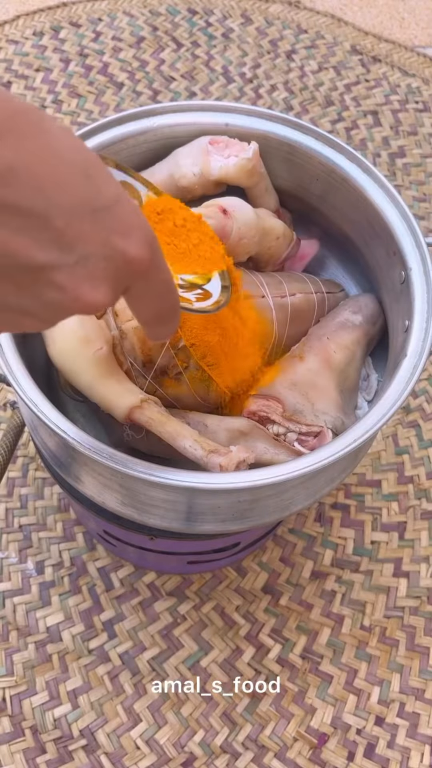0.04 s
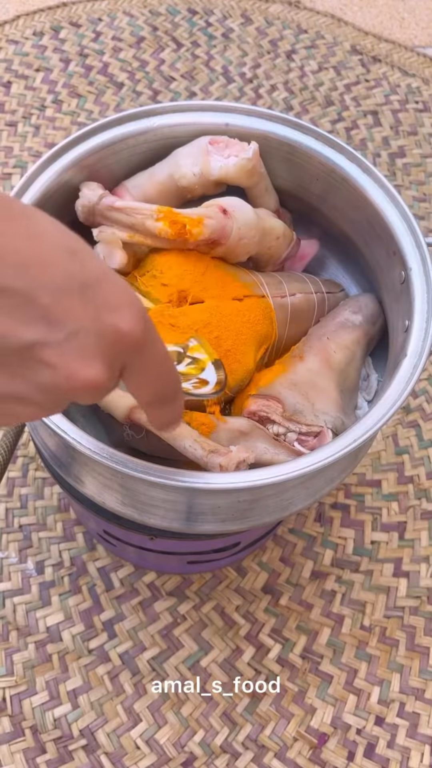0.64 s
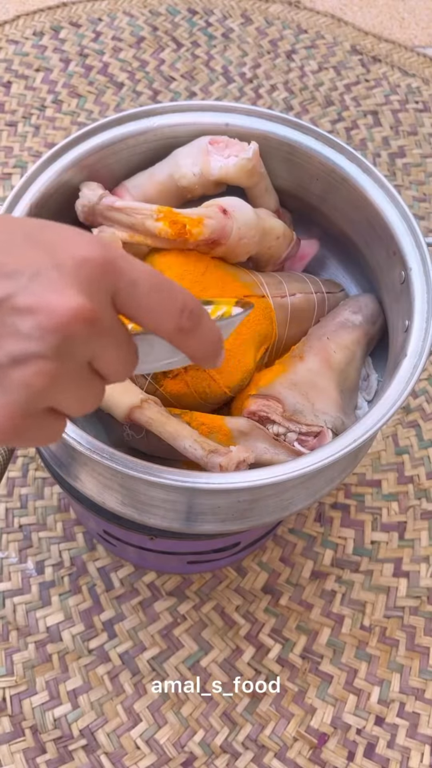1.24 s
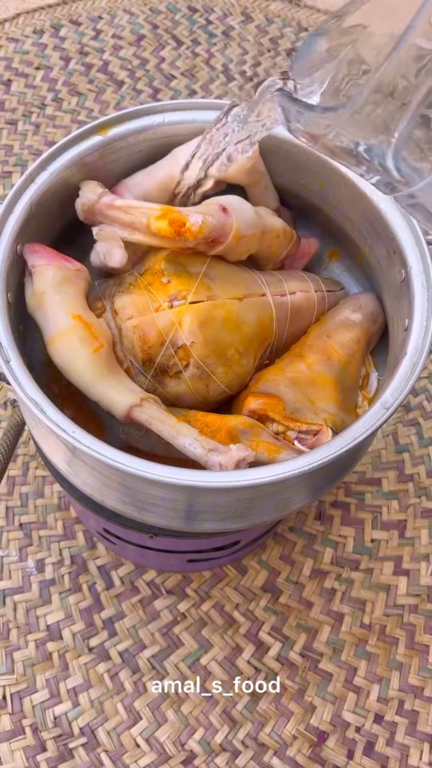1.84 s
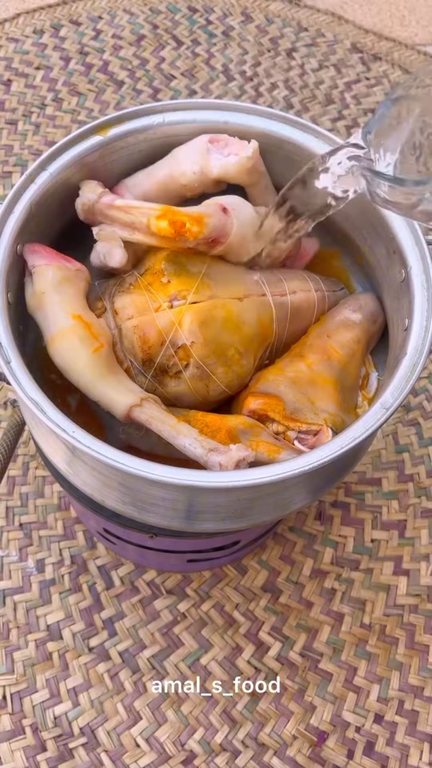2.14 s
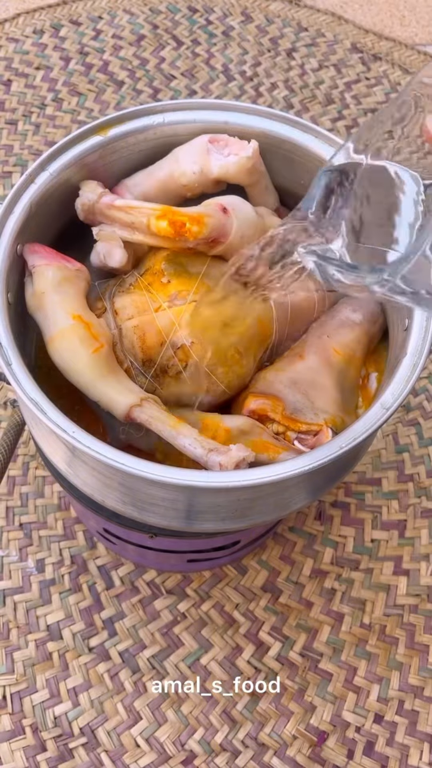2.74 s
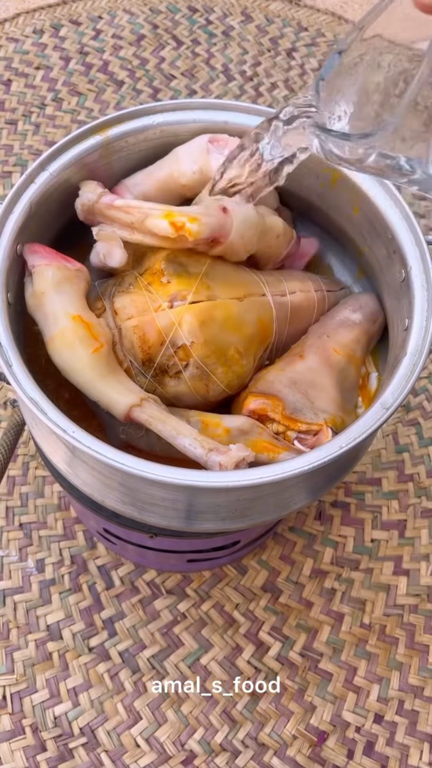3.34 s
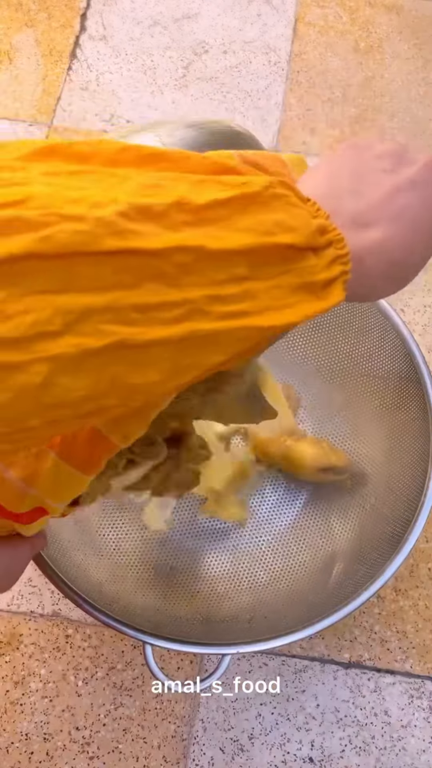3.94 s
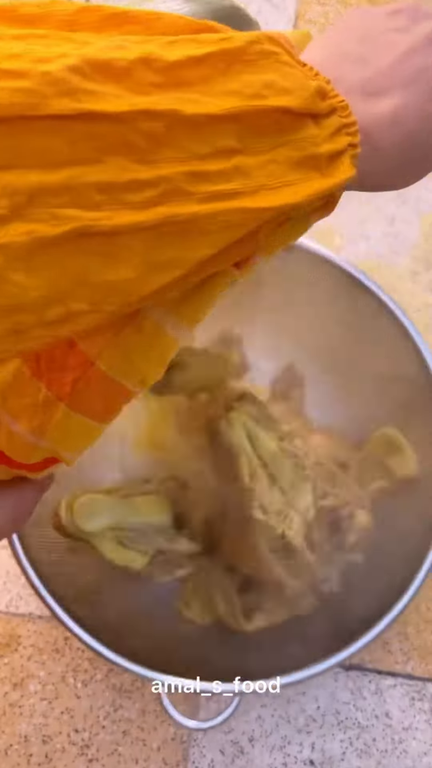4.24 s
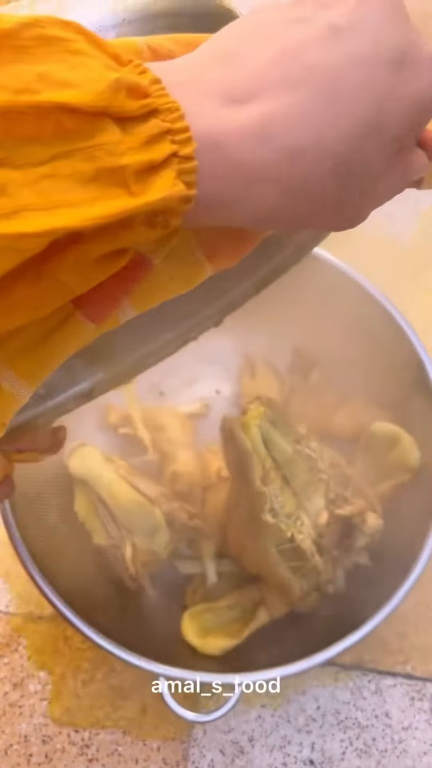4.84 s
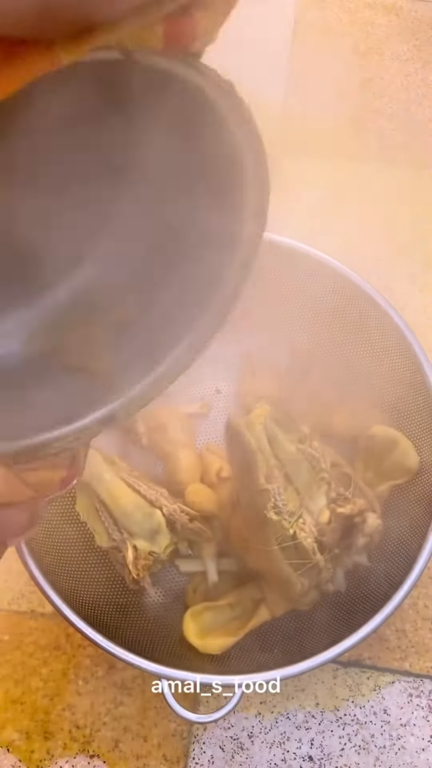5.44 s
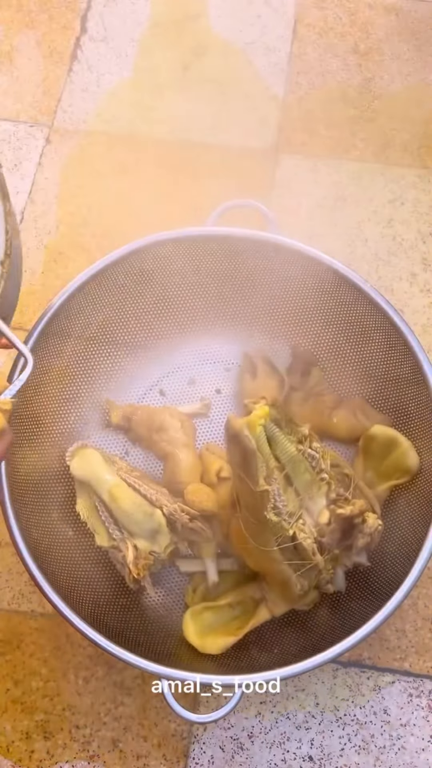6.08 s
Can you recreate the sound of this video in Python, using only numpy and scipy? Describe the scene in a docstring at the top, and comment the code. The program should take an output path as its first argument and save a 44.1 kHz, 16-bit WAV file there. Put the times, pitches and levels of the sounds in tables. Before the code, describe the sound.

A splashing pour into a metal pot, then wet thuds in a steel colander and trickling broth, over a faint low hum.

```python
"""A low rumble and a wandering hum open the scene and stay under it; spice swishes off a spoon.
A jug pours water over meat in a steel pot: trapped air gurgles and pings, drops splash and tick.
Cooked meat and broth are tipped into a steel colander: wet slaps that keep the bowl ringing faintly,
popping air pockets, a falling slurp, dull thuds and bone knocks, then the hiss of draining broth.
All of it plays close to a small two-port microphone."""
import sys
import numpy as np
from scipy import signal
from scipy.fft import rfft, irfft, next_fast_len
from scipy.io import wavfile
from scipy.ndimage import uniform_filter1d, map_coordinates

SR = 44100
rng = np.random.default_rng(int(sys.argv[2]) if len(sys.argv) > 2 else 0)


def store_pcm(level_fs):
    """Save levels as 16-bit WAV."""
    pcm = np.round(np.clip(level_fs, -1, 1) * 32767).astype(np.int16)
    wavfile.write(sys.argv[1], SR, np.atleast_2d(pcm).T)


N = 273905

# hum tones: t/s, length/s, f/Hz, sink/(Hz/s), level/dB
HUM_TONES = [(-.03, 0.21, 119, 19, -39), (0.304, 0.2, 111.1, 17, -43.5), (0.548, 0.53, 132.4, 22, -44),
             (1.706, 2.82, 102.7, 1.566, -45), (5.184, 0.81, 194.2, 0.4, -54)]
# swishes of powder: peak t/s, level/dB, swell/s
SWISHES = [(0.624, -52.5, 0.011), (.799, -73, 0.011), (0.966, -65, 0.012)]
# the stream swings off the meat into the pool: t/s, length/s, gurgle/dB, bubbling/dB, spatter/dB
PLUNGES = [(1.529, 0.097, -64, -43.5, -39), (1.805, 0.13, -52, -40, -40), (1.885, 0.072, -44.5, -37, -43),
           (2.11, 0.073, -46, -42, -65), (2.188, 0.047, -54, -37.5, -61), (2.329, 0.13, -57, -42.5, -41),
           (2.546, 0.079, -59, -58, -41), (2.612, 0.058, -51, -38.5, -37.5), (2.73, 0.033, -42, -42, -42.5),
           (3.042, 0.066, -53.5, -47.5, -41), (3.2, 0.16, -41.5, -41, -46),
           (3.383, 0.35, -46, -44.5, -61.5)]
# the stream pounds the bottom of the pot: t/s, length/s, level/dB
POUNDING = [(3.2, 0.89, -37.5)]
# the stream thins for a moment: t/s, half length/s, dip/dB
THINNINGS = [(1.404, 0.057, -6), (2.109, .022, -7.5), (2.826, 0.0046, -6.5), (2.917, 0.016, -3)]
# lumps of water hit steel and skin: t/s, snap/dB, plop/dB, snap length/s
SPLASHES = [(1.386, -33, -65, 0.0025), (1.481, -32.5, -44.5, 0.0027), (1.533, -29, -45, 0.0032),
            (1.598, -39.5, -38, 0.0018), (1.628, -28, -56, 0.0027), (1.765, -33, -39.5, 0.0017),
            (1.776, -33, -40, 0.00084), (2.019, -28.5, -39, 0.0022), (2.139, -31, -62, 0.0019),
            (2.152, -45, -55, .0025), (2.239, -37.5, -44, 0.0058), (2.284, -28, -52, .0015),
            (2.356, -21.5, -43, 0.00052), (2.415, -33, -42, 0.0031), (2.511, -26, -60, 0.00068),
            (2.54, -30, -65, 0.0015), (2.609, -35, -47, 0.0055), (2.755, -32, -35.5, 0.0013),
            (2.846, -37, -42, 0.0037), (3.014, -37, -44, 0.0016), (3.036, -27, -58, .001),
            (3.058, -23.5, -38.5, 0.0029), (3.185, -28.5, -50, .0014), (3.272, -29, -58, 0.0043),
            (3.391, -50, -37.5, 0.0015), (3.463, -30.5, -43, 0.0016), (3.501, -32, -41, 0.0023),
            (3.567, -36.5, -62, .0059), (3.71, -20, -39, 0.0026)]
# solo bubbles, drips and popping air pockets: t/s, level/dB, f/Hz, t60/s
BUBBLES = [(1.533, -22, 4430, 0.017), (1.542, -30.5, 1410, 0.031), (1.765, -31, 1140, 0.023),
           (1.815, -30, 1305, 0.047), (1.844, -19, 1970, .016), (2.208, -24.5, 1940, 0.02),
           (2.291, -31, 1820, .015), (2.359, -15.5, 5400, 0.006), (2.477, -34, 1240, 0.066),
           (2.62, -17, 2820, 0.022), (2.754, -23.5, 1090, 0.018), (2.778, -31.5, 1210, 0.031),
           (2.848, -30.5, 1800, 0.02), (3.257, -28, 558, 0.089), (3.28, -33, 705, 0.04),
           (3.305, -26.5, 597, .07), (3.33, -27.5, 843, 0.055), (3.313, -30.5, 1940, 0.04),
           (3.388, -24, 580, 0.037), (3.4655, -7.5, 8000, 0.001), (3.59, -25.5, 600, .03),
           (3.691, -21.5, 1980, 0.012), (3.73, -32, 3600, 0.0072), (3.858, -18, 1174, 0.03),
           (3.884, -28, 3370, 0.0094), (4.003, -6, 1040, 0.015), (4.008, -8, 1810, 0.016),
           (4.017, -6, 1146, 0.022), (4.02, -10.5, 1950, 0.019), (4.071, -18, 2140, 0.019),
           (4.072, -20, 7400, .012), (4.176, -13, 915, 0.05), (4.176, -15, 1850, 0.018),
           (4.199, -10, 2190, 0.025), (4.2, -12, 858, .03), (4.2, -8.5, 2690, .012),
           (4.378, -12, 1320, 0.014), (4.378, -5.5, 808, 0.022), (4.767, -22, 2090, 0.0094),
           (4.779, -22, 1900, 0.0046), (4.779, -10.5, 3900, 0.0045)]
# broth gushes out with the meat: t/s, length/s, level/dB
GUSHES = [(3.745, 0.39, -45), (4.005, 0.075, -31.5), (4.09, 0.17, -32), (4.2, 0.1, -26.5),
          (4.37, 0.035, -31), (4.43, 0.023, -32), (4.655, 0.014, -42), (4.76, 0.011, -43)]
# soft low swells as the emptied pot is moved away: t/s, length/s, level/dB
SWELLS = [(4.84, 0.044, -37.5), (5.23, 0.09, -40.5), (5.75, 0.029, -44.5), (6.11, 0.018, -49)]
# wet pieces land: t/s, level/dB, spray offset/dB, length/s, tone/ratio to SLAP_EQ
SLAPS = [(3.736, -43, -9, 0.073, 1.33), (3.865, -29, -20, 0.0037, 1.06), (3.899, -48, 6, 0.0091, 1.3),
         (4.002, -18.5, -21, 0.0034, 1.08), (4.01, -18.5, -16, .004, 1.11), (4.016, -21, -29, 0.021, 1.09),
         (4.0684, -28.5, 2, 0.012, 0.93), (4.177, -22.5, -16, 0.0046, 1.03), (4.193, -32, -2, .003, 0.79),
         (4.199, -19, -11, 0.0043, 0.92), (4.217, -38, -18, 0.0042, .9), (4.247, -21, -4, 0.0072, 1.2),
         (4.279, -21.5, 0.5, 0.0052, 1.9), (4.311, -27, -18, 0.0043, 1.4), (4.377, -20, -15, 0.0067, 1.1),
         (4.444, -19.5, -23, 0.0031, 0.82), (4.454, -25, -2, 0.0043, 1.04), (4.643, -53.5, 11, 0.017, 1),
         (4.67, -45, -19, .003, .85), (4.674, -30.5, -13, 0.0047, 0.97), (4.766, -32.5, -7, 0.0036, 0.77),
         (4.781, -46, 3, 0.0014, 1.2)]
# the meat's weight on colander and pot: t/s, level/dB, f/Hz, t60/s
THUDS = [(3.755, -20, 153, 0.14), (3.796, -23, 152, 0.18), (3.871, -25, 141, 0.066), (4.08, -17, 121, 0.11),
         (4.104, -15.5, 138, 0.14), (4.214, -13.5, 131, 0.066), (4.253, -12, 101.7, 0.12),
         (4.272, -10.5, 122, 0.043), (4.288, -7.5, 418.5, 0.076), (4.306, -19.5, 115, 0.073),
         (4.393, -18, 86, 0.09), (4.444, -20, 244, 0.095), (4.476, -10, 110, 0.03),
         (4.673, -16.5, 420, 0.026), (4.771, -21, 143, 0.036), (5.765, -41.5, 431, 0.16)]
# bones knock the colander: t/s, level/dB
KNOCKS = [(4.012, -25), (4.288, -14), (4.38, -28)]
# ringing modes of the colander: f/Hz, level/dB, t60/s
BOWL_MODES = [(395, -4, .09), (458, -2.5, .36), (522, -26, .45), (792, -25, .55), (997, -21, .5),
              (1228, -22, .5), (1394, -27, .5), (1600, -27, .5), (1805, -22, .45), (1986, -27, .4),
              (2154, -25, .45), (2366, -29, .35), (2623, -32, .3), (3055, -29, .25)]

# EQ curves that colour each layer: f/Hz, level/dB
RUMBLE_EQ = [(22, -37), (31, -14), (42, -9.5), (75, 3), (130, -3.5), (220, -11.5), (450, -17.5), (800, -28),
             (1500, -32), (2200, -36.5), (3200, -49), (5000, -51), (7000, -59.5), (15000, -73)]
GURGLE_EQ = [(150, -29), (300, 6), (450, 4.5), (600, 5.5), (800, 1), (1200, 6), (2500, -15)]
BUBBLING_EQ = [(500, -1), (900, -3), (1300, -1.5), (1900, 6.5), (2400, 6), (2900, 0), (3600, 13.5),
               (6000, -50)]
SPATTER_EQ = [(1500, -53), (2900, 3.5), (3700, -6), (5000, 4.5), (6500, -1.5), (8500, -2.5), (11000, -8.5),
              (12300, -15), (15000, -24.5)]
DRAIN_EQ = [(1200, -26), (2000, -5), (2700, -8), (3500, 1), (4900, 3), (6500, -3.5), (8500, -7),
            (11000, -16), (15000, -31.5)]
BOWL_DRUM_EQ = [(50, -17), (100, 8.5), (160, 3.5), (240, -1.5), (400, -5.5), (550, -11.5), (1000, -35)]
SPRAY_EQ = [(1200, -21), (2500, 7), (3700, -2), (5000, 3), (7800, -0.5), (10000, -10.5), (12000, -14),
            (15000, -27)]
SLAP_EQ = [(150, -24), (400, -12), (620, -9), (950, 1), (1250, -1), (1500, -7), (1900, 0), (2400, -7),
           (3200, -15), (5000, -25), (12000, -55)]
POWDER_EQ = [(3000, -5), (4500, -12), (5800, -1), (7000, -5), (8500, -2.5), (10000, -7), (11000, -2),
             (15000, -24)]
POT_DRUM_EQ = [(90, -20), (120, 12.5), (150, 2.5), (210, -12), (300, -4), (450, -52), (800, -39)]
SNAP_EQ = [(1200, -36), (3000, 20.5), (5000, 21), (8500, 12), (11000, 5.5), (15000, -14)]
PLOP_EQ = [(200, 1), (550, 16), (1200, 5), (2000, 21.5), (3000, 12.5), (6000, -2), (12000, -52)]
TRICKLE_EQ = [(400, -5), (800, 3), (1400, 0), (2100, 3), (2800, -21)]
SLOSH_EQ = [(400, 8.5), (600, -5.5), (1000, -1), (1400, -6.5), (2000, 0.5), (2800, 0), (5000, -4)]

# paths to the two ports: f/Hz, left lead/rad, left over right/dB, scattered share/0-1
POT_PATH = [(100, -.05, 0, 0), (300, -.7, -1, .08), (600, -1.7, -3.5, .05), (950, -2.9, -5, .55),
            (1300, -6, -4, .3), (1750, -5.9, -3, .07), (2200, -4.4, -3, .33), (2900, -3.4, -2, .12),
            (4600, -4.7, 0, .35), (6000, -3.1, 0, .03), (7700, 0, 0, .15), (10000, 2, 0, .5),
            (14000, 6.3, 0, .1)]
BOWL_PATH = [(100, -.17, -.3, 0), (200, -.33, -.4, .01), (400, -.95, -1, .03), (700, -2, -5, .25),
             (1050, -3, -6.5, .5), (1750, 0, -4.5, .17), (2250, 1.6, -4, .45), (2750, 3.1, -3, .06),
             (4600, .6, -1, .45), (6100, 3.1, 0, .12), (7700, 6.3, 0, .15), (11000, 7, 0, .45),
             (15000, 12.5, 0, .2)]

POUR_START_S, TIP_START_S, DRAIN_END_S = 1.376, 3.73, 6.195  # the pour stops as the tipping starts
TIME = np.arange(N) / SR


def amp(db):
    """Decibels to gain."""
    return 10 ** (np.asarray(db) / 20)


def unit(x):
    """Scale to rms 1."""
    return x / np.sqrt(np.mean(x ** 2) + 1e-20)


def along(points, hz):
    """Read a curve of (f/Hz, value) points on a log frequency axis."""
    f, values = np.transpose(points)
    return np.interp(np.log(hz + 1), np.log(f), values)


def wobble(rate):
    """A smooth random modulator, rate knots a second."""
    return map_coordinates(rng.standard_normal(4096), [TIME * rate], mode="wrap")


def filtered(x, response):
    """Filter x by a complex response of frequency."""
    size = next_fast_len(N + 8192)
    return irfft(rfft(x, size) * response(np.fft.rfftfreq(size, 1 / SR)), size)[..., :N]


def coloured(x, eq):
    """x through an EQ curve that rolls off beyond both ends, at rms 1."""
    (low_hz, low_db), (high_hz, high_db) = eq[0], eq[-1]
    closed = [(low_hz / 2, low_db - 40), *eq, (high_hz * 2, high_db - 40)]
    return unit(filtered(x, lambda hz: amp(along(closed, hz))))


def noise(eq):
    """Fresh coloured noise at rms 1."""
    return coloured(rng.standard_normal(N), eq)


def add(track, s, sound):
    """Mix a sound into a track at time s."""
    part = track[max(round(s * SR), 0):][:len(sound)]
    part += sound[:len(part)]


def between(start, end):
    """A gate, open between two times, with short fades."""
    return uniform_filter1d(((TIME >= start) & (TIME <= end)) * 1., size=256)


def held(rows, rise_s, fall_db_per_s):
    """Attack, hold and release for each row of t/s, length/s, level/dB; overlaps add in power."""
    power = np.zeros(N)
    for s, length, db in rows:
        attack = np.clip((TIME - s) / rise_s, 0, 1)
        release_db = fall_db_per_s * np.maximum(TIME - s - length, 0)
        power += (attack * amp(db - release_db)) ** 2
    return np.sqrt(power)


def burst(length, softness):
    """A hit envelope with peak 1 and a decay time of length seconds; softness rounds the attack."""
    age = np.arange(SR // 4) / SR / length
    shape = age ** softness * np.exp(-age)
    return shape / shape.max()


def bubble(t, hz, t60, climb):
    """A bubble rings and climbs in pitch as it nears the surface."""
    age = np.minimum(t / t60, 1.5)
    chirp = np.sin(2 * np.pi * hz * t * (1 + climb * age / 2))
    return chirp * amp(-60 * t / t60) * (1 - np.exp(-2 * hz * t))


def swarm(per_s, low_hz, high_hz, cycles, spread_db, climb, samples):
    """A cloud of up to 8000 random bubbles, each ringing for about that many cycles; rms 1."""
    count = min(int(per_s * N / SR), 8000)
    draws = np.random.default_rng(rng.integers(2 ** 31)).random((count, 4))
    when, pitch, life, strength = draws.T[:, :, None]
    hz = low_hz * (high_hz / low_hz) ** pitch
    gain = amp(-spread_db * np.log(1 - .97 * strength))  # many quiet, a few loud
    offsets = np.arange(samples)
    grains = gain * bubble(offsets / SR, hz, cycles * (.5 + life) / hz, climb)
    positions = (when * N).astype(int) + offsets
    return unit(np.bincount(positions.ravel(), grains.ravel(), N)[:N])


def ports(x, path, t60, hop=2048):
    """Stereo image: direct sound with a phase between the ports, plus short scatter off steel walls."""
    path = np.array(path)
    phase, balance_db, share = (lambda hz, k=k: along(path[:, [0, k]], hz) for k in range(1, 4))
    t = np.arange(2 * hop) / SR
    decay = amp(-60 * t / t60) * (1 - np.exp(-t / 0.000082))
    fade = np.sqrt(signal.windows.hann(2 * hop))
    padded = np.pad(x, (0, 2 * hop))
    scattered = np.zeros((2, N))
    # fresh scatter in each window keeps the sound diffuse, with no fixed ringing pitch
    for start in range(0, N, hop):
        for port in scattered:
            tail = rng.standard_normal(len(t)) * decay / np.linalg.norm(decay)
            add(port, start / SR, signal.fftconvolve(fade * padded[start:start + 2 * hop], tail))
    side = np.array([[.5], [-.5]])
    direct = filtered(x, lambda hz: np.sqrt(1 - share(hz)) * np.exp(1j * side * phase(hz)))
    diffuse = filtered(scattered, lambda hz: np.sqrt(share(hz)))
    return filtered(direct + diffuse, lambda hz: amp(side * balance_db(hz)))


def background(rumble_db=-42.5, sway_db=1.76):
    """The bed: a swaying low rumble and unsteady hum tones, each sinking in pitch."""
    bed = amp(rumble_db + sway_db * wobble(2.78)) * noise(RUMBLE_EQ)
    for s, length, hz, sink, db in HUM_TONES:
        pitch_hz = (hz - sink * (TIME - s)) * (1 + 0.012 * wobble(17))
        level = held([(s, length, db)], rise_s=0.016, fall_db_per_s=64) * amp(0.4 * wobble(5.3))
        bed += level * np.sqrt(2) * np.sin(2 * np.pi * np.cumsum(pitch_hz) / SR)
    return bed


def spice():
    """Powder slides off the spoon in three soft swishes, and the last grains settle."""
    swish = sum(amp(db) * np.exp(-abs(TIME - s) / swell) for s, db, swell in SWISHES)
    settling = held([(s, swell, db) for s, db, swell in SWISHES], rise_s=0.01, fall_db_per_s=125)
    return np.hypot(swish, amp(-15) * settling) * noise(POWDER_EQ)


def runoff(hiss_db=-49, trickle_db=-55.5):
    """Broth runs through the holes: a wavering hiss with drips, over a low trickle."""
    fizz = swarm(1200, 2380, 12000, cycles=5.7, spread_db=2.5, climb=.05, samples=150)
    drips = swarm(38, 2750, 12500, cycles=22, spread_db=3.5, climb=.05, samples=300)
    waver_db = 0.6 * unit(wobble(9) + wobble(40))
    hiss = coloured(0.38 * fizz + amp(-16.5) * drips + rng.standard_normal(N), DRAIN_EQ)
    return amp(hiss_db + waver_db) * hiss + amp(trickle_db) * noise(TRICKLE_EQ)


def drain(floor_share=0.34):
    """The runoff in stereo, widened by the share that scatters off the floor to each port."""
    near = np.sqrt(1 - floor_share) * ports(runoff(), BOWL_PATH, t60=0.078)
    wide = np.sqrt(floor_share) * np.array([runoff(), runoff()])
    return between(TIP_START_S, DRAIN_END_S) * (near + wide)


def pour():
    """The stream drums on the pot and traps air: deep gurgles, surface bubbles, spatter and ticks."""
    plunges = np.array(PLUNGES)
    release = dict(rise_s=0.026, fall_db_per_s=173)
    gurgle_level, bubbling_level, spatter_level = (
        np.hypot(amp(floor_db), held(plunges[:, [0, 1, column]], **release))
        for column, floor_db in [(2, -55), (3, -49), (4, -43.5)])
    surge = wobble(60)  # the stream breaks into lumps
    drum = noise(POT_DRUM_EQ)
    large = swarm(420, 447, 927, cycles=21, spread_db=1.5, climb=0.042, samples=2400)
    gurgle = coloured(large + 0.24 * rng.standard_normal(N), GURGLE_EQ)
    medium = swarm(700, 840, 3260, cycles=13, spread_db=2.2, climb=0.081, samples=1200)
    froth = coloured(medium + 0.6 * rng.standard_normal(N), BUBBLING_EQ)
    fine = swarm(1280, 2600, 13000, cycles=16, spread_db=3.2, climb=.06, samples=500)
    fizz = fine + 0.75 * rng.standard_normal(N)
    ticks = swarm(30, 2900, 11000, cycles=3.7, spread_db=1, climb=0, samples=200)  # drops on steel
    pings = swarm(36.5, 1290, 5100, cycles=35, spread_db=2.5, climb=0.098, samples=1200)
    drum_level = np.hypot(amp(0.5) * gurgle_level, held(POUNDING, **release))
    pool = gurgle_level * amp(2 + 0.65 * surge) * gurgle + drum_level * drum
    bubbling = bubbling_level * amp(0.5 * surge) * (amp(-1.7) * froth + amp(-9.5) * pings)
    spatter = spatter_level * amp(0.6 + 1.03 * surge) * coloured(fizz + amp(-8.5) * ticks, SPATTER_EQ)
    thinning_db = sum(db * np.exp(-((TIME - s) / width) ** 2) for s, width, db in THINNINGS)
    return between(POUR_START_S, TIP_START_S) * (pool + amp(thinning_db) * (bubbling + spatter))


def splashes(snap_trim_db=-4, plop_trim_db=3):
    """Lumps of water land with a snap of spray and a longer plop."""
    snaps, plops = np.zeros(N), np.zeros(N)
    for s, snap_db, plop_db, length in SPLASHES:
        add(snaps, s, amp(snap_db + snap_trim_db) * burst(length, softness=.5))
        add(plops, s, amp(plop_db + plop_trim_db) * burst(2 * length, softness=.5))
    return snaps * noise(SNAP_EQ) + plops * noise(PLOP_EQ)


def plinks(start, end, climb, flutter, trim_db=1):
    """Solo bubbles between two times; those squeezed between soft pieces take more flutter."""
    out, t = np.zeros(N), np.arange(SR // 5) / SR
    for s, db, hz, t60 in BUBBLES:
        if start <= s < end:
            add(out, s, amp(db + trim_db) * bubble(t, hz, t60, climb))
    return out * (1 + flutter * wobble(700)) / np.hypot(1, flutter)


def broth():
    """Each gush sloshes between the pieces, sprays and drums on the bowl; low swells follow."""
    slosh_level = held(GUSHES, rise_s=0.0085, fall_db_per_s=113)
    drum_level = amp(2) * held(GUSHES, rise_s=0.0085, fall_db_per_s=73)  # outlasts the slosh
    swell_level = held(SWELLS, rise_s=0.011, fall_db_per_s=152)
    bubbles = swarm(700, 614, 2960, cycles=3.4, spread_db=1, climb=0.06, samples=900)
    slosh = coloured(bubbles + rng.standard_normal(N), SLOSH_EQ)
    drumming = np.hypot(drum_level, swell_level) * noise(BOWL_DRUM_EQ)
    spray = amp(-12.5) * noise(SPRAY_EQ)
    return between(TIP_START_S, DRAIN_END_S) * (drumming + slosh_level * (slosh + spray))


def slurp(start_s=4.212, length_s=0.093, db=-28.5, start_hz=1900, octaves_per_s=7.8, width_hz=200):
    """The meat slides out and the hollow behind it grows, so its resonance falls."""
    age = np.clip(TIME - start_s, 0, 2 * length_s)
    phase = 2 * np.pi * np.cumsum(start_hz * 2 ** (-octaves_per_s * age)) / SR
    noise_band = wobble(2 * width_hz) * np.sin(phase) + wobble(2 * width_hz) * np.cos(phase)
    return held([(start_s, length_s, db)], rise_s=0.0067, fall_db_per_s=600) * unit(noise_band)


def bone_knocks(trim_db=-1):
    """Bones knock the steel bowl; the food in it damps the ring."""
    out, t = np.zeros(N), np.arange(SR // 2) / SR
    attack = 1 - np.exp(-t / .003)
    for s, db in KNOCKS:
        ring = sum(amp(mode_db + rng.normal(0, 0.94) - 60 * t / t60) * np.sin(2 * np.pi * hz * t)
                   for hz, mode_db, t60 in BOWL_MODES)
        add(out, s, amp(db + trim_db) * attack * ring)
    return out


def bowl_ring(drive):
    """The bowl's modes ring on after whatever shakes it, at the rms of the drive."""
    t = np.arange(SR // 2) / SR
    modes = sum(amp(-60 * t / t60) * np.sin(2 * np.pi * hz * t) for hz, _, t60 in BOWL_MODES)
    return drive.std() * unit(signal.fftconvolve(drive, modes)[:N])


def thuds(trim_db=4.5, low_cut_hz=55):
    """The meat's weight lands as low damped tones; a low cut keeps the thuds free of deep bass."""
    out, t = np.zeros(N), np.arange(SR // 2) / SR
    attack = 1 - np.exp(-t / 0.0026)
    for s, db, hz, t60 in THUDS:
        add(out, s, amp(db + trim_db - 60 * t / t60) * attack * np.sin(2 * np.pi * hz * t))
    return signal.sosfilt(signal.butter(4, low_cut_hz, "highpass", fs=SR, output="sos"), out)


def meat_slaps(slap_trim_db=2, spray_trim_db=3, ring_db=-10, soft_hz=5540):
    """Each piece slaps down wet with its own tone, shakes the bowl and throws spray."""
    slaps, spray_level = np.zeros(N), np.zeros(N)
    for s, db, spray_db, length, tone in SLAPS:
        shape = burst(length, softness=0.14)
        eq = amp(along(SLAP_EQ, np.fft.rfftfreq(len(shape), 1 / SR) / tone))
        squelch = irfft(rfft(rng.standard_normal(len(shape))) * eq, len(shape))
        add(slaps, s, amp(db + slap_trim_db) * shape * unit(squelch))
        add(spray_level, s, amp(db + spray_db + spray_trim_db) * burst(length, softness=0.45))
    droplets = swarm(1300, 2230, 14900, cycles=3.4, spread_db=3, climb=0.059, samples=150)
    spray = coloured(droplets + 0.38 * rng.standard_normal(N), SPRAY_EQ)
    smack = filtered(slaps, lambda hz: 1 / (1 + (hz / soft_hz) ** 6))  # soft meat has no sharp click
    return smack + amp(ring_db) * bowl_ring(smack) + spray_level * spray


def scene():
    """The mix: pot and colander stand at slightly different angles to the microphone."""
    pot = spice() + pour() + splashes() + plinks(0, TIP_START_S, climb=0.24, flutter=0.066)
    pot_stereo = ports(pot, POT_PATH, t60=0.038)
    meat = meat_slaps() + thuds() + slurp()
    air_pockets = plinks(TIP_START_S, DRAIN_END_S, climb=0.13, flutter=0.5)
    bowl = meat + air_pockets + bone_knocks() + broth()
    return pot_stereo + ports(bowl + background(), BOWL_PATH, t60=0.046) + drain()


def record(dry):
    """A brick-wall high cut takes off the very top."""
    return filtered(dry, lambda hz: hz < 15850)


dry = scene()
out = record(dry)
store_pcm(out)
```